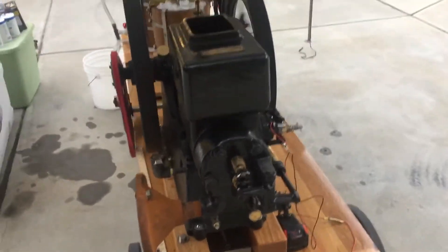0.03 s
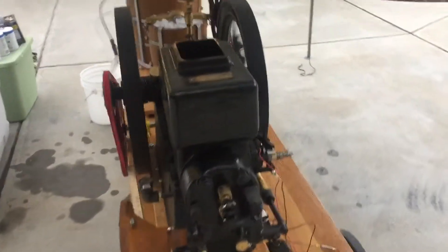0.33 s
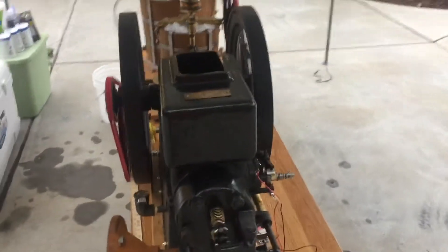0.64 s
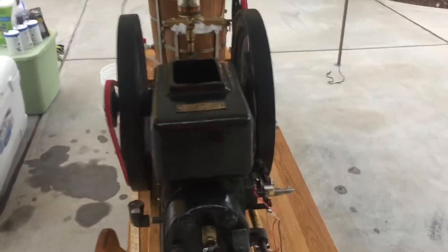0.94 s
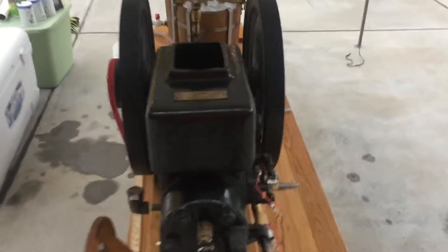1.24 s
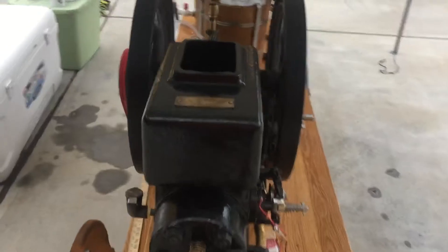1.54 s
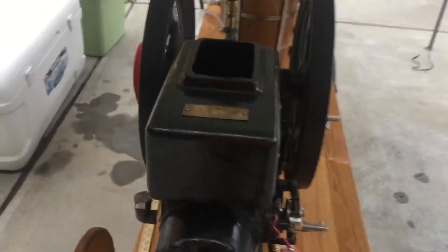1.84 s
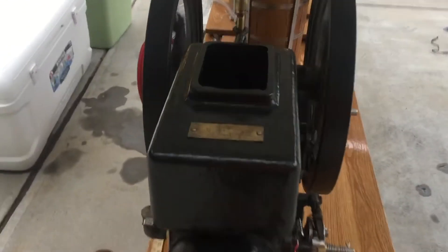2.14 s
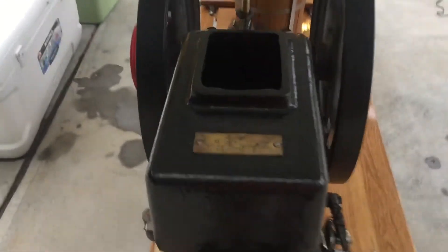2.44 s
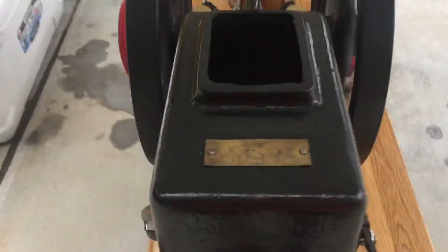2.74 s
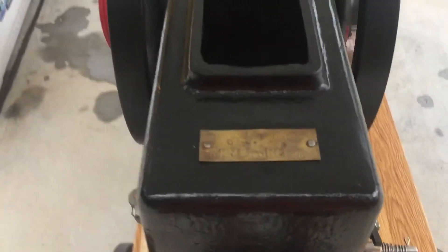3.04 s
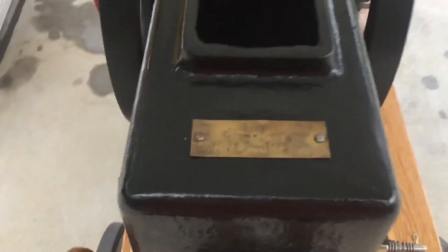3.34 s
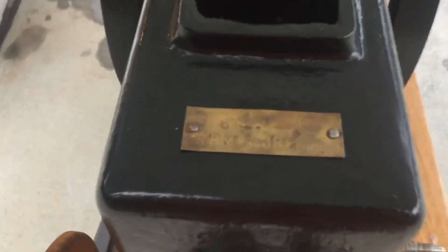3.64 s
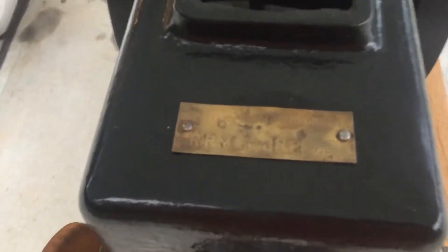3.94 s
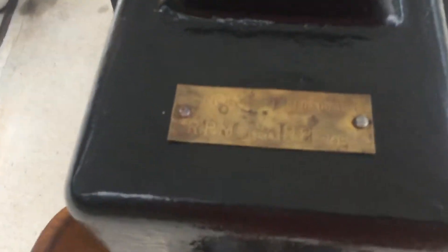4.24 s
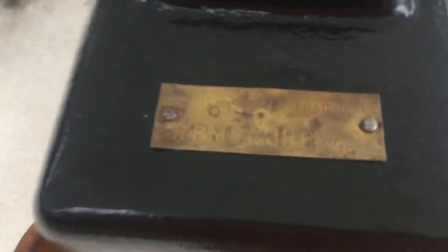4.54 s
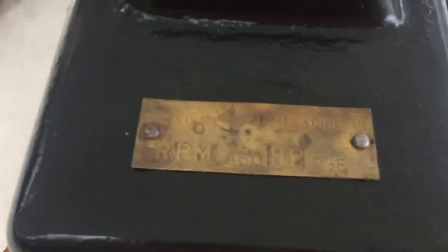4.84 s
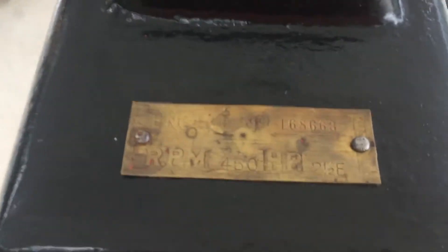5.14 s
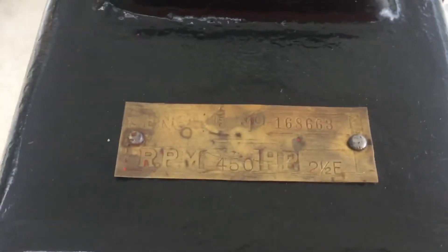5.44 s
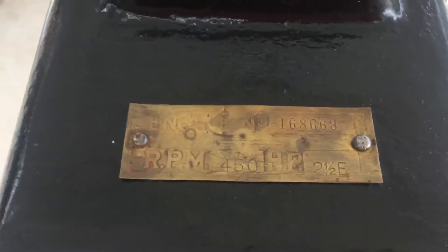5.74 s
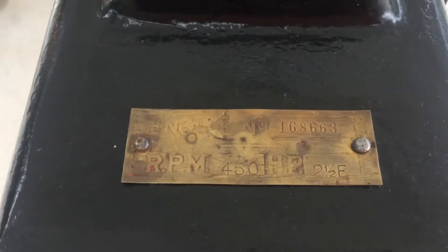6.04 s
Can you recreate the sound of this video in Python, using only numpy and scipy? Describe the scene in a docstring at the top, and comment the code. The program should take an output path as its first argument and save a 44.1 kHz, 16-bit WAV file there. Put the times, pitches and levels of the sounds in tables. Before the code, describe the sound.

Rhythmic hollow knocks and metal clacks from an antique engine running close by, broken by two short intake snorts and loud cracks.

```python
"""A single-cylinder hit-and-miss engine coasts over a concrete floor, slowing steadily, with a hollow
knock each turn; gears, push rod and governor latch clack at fixed crank angles. Near 0.9 s it is slow
enough to fire: the intake valve snorts, the igniter snaps and, at 1.25 s, the exhaust cracks.
It coasts again, fires once more at 4.3 s and coasts on. The clatter grows louder overall,
dips near 4.5 s, and takes on the hollow ring of the open water hopper."""
import sys
import numpy as np
from scipy import signal
from scipy.fft import rfft, irfft
from scipy.io import wavfile
from scipy.ndimage import uniform_filter1d

SR = 44100
rng = np.random.default_rng(int(sys.argv[2]) if len(sys.argv) > 2 else 0)


def store_pcm(level_fs):
    """Save levels as 16-bit WAV."""
    pcm = np.round(np.clip(level_fs, -1, 1) * 32767).astype(np.int16)
    wavfile.write(sys.argv[1], SR, np.atleast_2d(pcm).T)


N = 272538
AGE = np.arange(SR // 3) / SR  # time since a blow, t/s
STROKE_S = .178  # duration of an intake stroke

# the exhaust valve opens on a fired charge: t/s, blast level/dB, boom level/dB
FIRINGS = [(1.2529, -3.5, -14), (4.2800, -4, -7.5)]
# the piston starts to draw a charge: t/s, level/dB
INTAKE_STROKES = [(.918, -1.5), (3.961, 2.5)]
# noise spectra: f/Hz, spectral level/dB
JET_SPECTRUM = [(100, 4.5), (280, 7.5), (600, 0.5), (1200, -0.5), (2300, -1), (2650, 4), (3200, 1.5),
                (3600, 2.5), (4400, -0.5), (6000, 0), (9000, -8), (16000, -15)]  # escaping gas
SUCTION_SPECTRUM = [(200, -17), (700, 3.5), (2200, 1), (4000, -2.5), (7000, -11.5), (11000, -14.5),
                    (16000, -17)]  # air at the intake valve
IRON_SPECTRUM = [(53, -19), (90, -33), (173, 8.5), (270, -1), (707, 2.5), (1150, -6.5), (1680, -3),
                 (1930, -3), (2080, -1.5), (3120, -11.5), (3930, -11.5), (5350, -24.5), (6490, -26.5),
                 (7710, -45), (9000, -30), (11700, -136), (19800, -120)]  # struck castings
TICK_SPECTRUM = [(2000, -40), (3900, 11), (5000, 5), (6400, 6.5), (7600, 0), (9200, 1.5), (10500, -5.5),
                 (16000, -8.5)]  # hard metal contact
BEARING_SPECTRUM = [(30, -33), (65, -8.5), (100, -8.5), (150, -1), (266, -4.5), (364, 4), (437, -3.5),
                    (560, -2.5), (720, 0), (1010, -8.5), (2010, -12), (2830, -17.5), (4000, -35),
                    (5500, -40), (9000, -43.5), (16000, -49)]  # rubbing bearings
# modes of the linkage: f/Hz, level/dB, t60/s
LINKAGE_MODES = [(372, -8.5, 0.13), (503, -1.5, 0.23), (716, -0.5, 0.065), (859, -7, 0.085),
                 (1134, -7, .08), (1324, 0, 0.063), (1390, -4.5, 0.067), (1592, 3.5, 0.05),
                 (2120, -12, 0.26), (2270, -16, 0.14), (2565, -13.5, 0.12), (6700, -28, 0.15)]
# the clatter at the microphone: t/s, level/dB before each part's weight, share of hopper resonance
CLATTER_COURSE = [(0, -3, -0.64), (1.5, -2.5, -0.24), (2.5, -.5, -0.00038), (3.4, -0.5, -0.063),
                  (4.5, -2.22, 0.69), (6.18, 0, 0.29)]


def exhaust(pipe_db=-7, shove_db=8, hum_db=-24, rise_s=0.0041):
    """Blowdown: released gas shoves the air, and its turbulent jet excites the pipe's resonances."""
    pipe_modes = [(2705, 0, 0.026), (2962, 2, 0.045), (3193, -3.5, 0.037), (3420, -5, .035),
                  (4100, -3, 0.038), (4440, -12, .035), (5700, -12, .025)]  # exhaust pipe: f/Hz, level/dB, t60/s
    slap_echoes = [(1.335, -35.5), (4.365, -48)]  # a short, bright echo just after each pop: t/s, level/dB
    echo_spectrum = [(1500, -18), (2400, -14), (2900, 4), (4200, -2), (6000, -8), (16000, -19)]  # that echo: f/Hz, spectral level/dB
    out = np.zeros(N)
    shove = np.sin(phase(200 + 530 * np.exp(-AGE / .0018))) * fade(0.00043, 0.029)
    from_peak = AGE - 0.0295
    boom = np.cos(2 * np.pi * 55 * (from_peak + 0.0029)) * np.exp(-(from_peak / 0.0069) ** 2 / 2)
    hum_hz = 95 + 115 * (1 - np.exp(-np.maximum(AGE - .025, 0) / 0.0354))  # climbs as the cylinder empties
    hum = punch(np.sin(phase(hum_hz)) * fade(0.01, 0.29))
    since = np.maximum(AGE - rise_s, 0)
    burst, drain = amp(10 - 60 * since / 0.05), amp(-13.5 - 60 * since / 0.25)
    flow = np.minimum(AGE / rise_s, 1) ** 2 * (burst + drain)
    for s, db, boom_db in FIRINGS:
        jet = noise(JET_SPECTRUM) * flow
        pipe = punch(signal.fftconvolve(jet, ring(pipe_modes))[:len(AGE)], size=1500)
        blast = jet + amp(pipe_db) * pipe + amp(shove_db) * shove
        gusts = 1 + 0.37 * flutter(300)
        add(out, s, amp(db) * blast + amp(boom_db) * boom + amp(hum_db) * hum * gusts)
    for s, db in slap_echoes:
        add(out, s, amp(db) * punch(noise(echo_spectrum) * fade(.02, 0.21), size=2200))
    return out


def intake(closed_hz=383.5, swept_ratio=2.75, rough=0.31, gulp_hz=175, gulp_width_s=0.0021):
    """Helmholtz resonance: as air hisses in, the cylinder's volume grows and its hum falls in pitch."""
    draught_spectrum = [(30, -20), (60, 6), (250, 0), (500, -22), (2000, -60)]  # rumble of indrawn air: f/Hz, spectral level/dB
    gulps = [(1.011, -14), (1.0455, -12), (4.043, -10.5), (4.0765, -11.5)]  # the valve gapes and admits a gulp of air: t/s, level/dB
    out = np.zeros(N)
    travel = (1 - np.cos(np.pi * np.minimum(AGE / STROKE_S, 1))) / 2
    hum_hz = closed_hz / np.sqrt(1 + swept_ratio * travel)
    hum_level = amp(-23 - 60 * np.maximum(AGE - 0.94 * STROKE_S, 0) / 0.24) * (1 - np.exp(-AGE / 0.0069))
    for s, db in INTAKE_STROKES:
        speed = piston_speed(s + AGE)
        rumble = amp(-36) * speed ** 2 * noise(draught_spectrum)
        eddies = 1 - rough + rough * (flutter(350) + 1j * flutter(350))  # turbulence roughens the hum
        hum = hum_level * (eddies * np.exp(1j * phase(hum_hz))).imag
        seep = amp(-42) * np.sin(np.pi * AGE / AGE[-1])
        hiss = (amp(-26) * abs(speed) ** 5.3 + seep) * noise(SUCTION_SPECTRUM)
        add(out, s, amp(db) * (hiss + rumble + hum))
    t = np.arange(-.01, .01, 1 / SR)
    gulp = -np.cos(2 * np.pi * gulp_hz * t) * np.exp(-(t / gulp_width_s) ** 2 / 2)
    for s, db in gulps:
        add(out, s + t[0], amp(db) * gulp)
    return out


def valve_flutter():
    """Impact excitation: the intake valve flaps on its seat, and its stem and head ring freely."""
    flaps = [(0.942, -43, -44, -39), (.953, -26, -38, -38), (0.982, -34, -31.5, -34),
             (1.002, -38, -49, -42), (1.015, -27.5, -48, -42), (1.038, -22, -47, -38),
             (1.066, -31.5, -40, -35), (3.986, -23.5, -42, -39), (4.012, -27, -32, -50),
             (4.036, -31, -32, -39), (4.071, -20.5, -35, -41), (4.097, -30.5, -54, -44)]  # blows on the seat: t/s, click level/dB, stem level/dB, head level/dB
    stem_modes = [(6980, 2, 0.11), (7650, -18, .06)]  # valve stem: f/Hz, level/dB, t60/s
    head_modes = [(10400, -18, .05), (13040, 10, 0.038)]  # valve head: f/Hz, level/dB, t60/s
    out = np.zeros(N)
    stem, head = punch(ring(stem_modes)), punch(ring(head_modes))
    for s, click_db, stem_db, head_db in flaps:
        click = punch(noise(SUCTION_SPECTRUM) * fade(0.00053, 0.08), size=400)
        click += 0.53 * punch(noise(TICK_SPECTRUM) * fade(0.00034, 0.021), size=400)
        add(out, s, amp(click_db) * click + amp(stem_db) * stem + amp(head_db) * head)
    return out


def igniter():
    """Release of elastic energy: the spring-loaded igniter trips with a dry, broadband double snap."""
    snaps = [(1.168, -29.5), (1.181, -20), (4.200, -27), (4.206, -18.5)]  # the igniter trips: t/s, level/dB
    snap_spectrum = [(1000, -1), (2700, -2.5), (3500, 1), (4600, -5), (6200, 3), (9000, -6.5), (12000, -7),
                     (15500, 1)]  # its snap: f/Hz, spectral level/dB
    out = np.zeros(N)
    for s, db in snaps:
        add(out, s, amp(db) * punch(noise(snap_spectrum) * fade(0.00068, 0.031), size=300))
    return out


def combustion(groan_db=-25, leak_db=-24, leak_rise_s=0.014, length_s=0.04):
    """Pressure rise: before each pop the burning charge loads the bearings and leaks past the valve."""
    out, t = np.zeros(N), np.arange(-length_s, 0, 1 / SR)
    for s, _, _ in FIRINGS:
        groan = noise(BEARING_SPECTRUM, size=len(t)) * np.sqrt(np.linspace(0, 1, len(t)))
        leak = noise(JET_SPECTRUM, size=len(t)) * np.exp(t / leak_rise_s)
        add(out, s + t[0], amp(groan_db) * groan + amp(leak_db) * leak)
    return out


def crank_knocks(db=-18.8, limp_db=0.8, jitter_s=0.00021):
    """Clearance impact: crank play closes once a turn, alternately hard and soft, and rings the body."""
    blows = [(.0031, -1.4), (0.0108, -2.3), (0.0174, -5), (0.0237, -4), (0.0284, -7.5)]  # chatter within one knock: t/s from its start, level/dB
    body_modes = [(155.3, -2, .14), (170.97, 23, 0.0047), (298.6, -4, 0.082), (345, 7, 0.096),
                  (396.5, -8, 0.089), (514.5, 0, .059), (620, -8.5, .105), (719.5, -8, 0.12)]  # hollow engine body: f/Hz, level/dB, t60/s
    out = np.zeros(N)
    for angle, accent_db in enumerate([limp_db, -limp_db]):
        for s in crank_passes(angle, every=2)[0]:
            chatter = np.zeros(len(AGE))
            body = ring(body_modes, scatter=.2) * fade(0.0008, 9.0)
            for delay, blow_db in blows:
                add(chatter, delay + jitter_s * rng.normal(), -amp(blow_db) * body)
            level = amp(db + accent_db + clatter_db(s, hush_db=-11, near=1.75))
            add(out, s, level * punch(chatter, size=1400))
    return out


def gear_train():
    """Backlash: gear play closes at each piston reversal; cam and linkage strike every second turn."""
    gear_modes = [(392.4, -2, .1), (566.5, 4.5, 0.065), (636, 1, 0.083), (707, 1, 0.07), (877.6, 0, 0.12),
                  (1419, -13, 0.067), (1585, -10, 0.14), (1687, -2, 0.076), (2061, -4, 0.12),
                  (2233, -11.5, 0.15), (2694, -12, 0.095), (3220, -13, 0.071), (3780, -14, 0.066),
                  (6100, -26, 0.071)]  # gears: f/Hz, level/dB, t60/s
    cam_modes = [(524.5, -0.5, 0.085), (719, 6, 0.077), (1124, -5.5, 0.098), (1270, -9, 0.1),
                 (1411, -1.5, 0.077), (1561, -0.5, 0.059), (1851, -17, .09), (1977, -10, 0.11),
                 (2464, -8, 0.087), (2700, -12, 0.074), (2995, -12.5, 0.1), (4250, -13, 0.072)]  # cam meeting the push rod: f/Hz, level/dB, t60/s
    rattle = [(.092, -34, -45), (.122, -53, -38)]  # exhaust valve gear: t/s after a pop, iron level/dB, tick level/dB
    outward = strikes(.456, every=1, db=-24, tick_db=-43.5, hush_db=-15.5, near=1.26, slip=.15,
                      tick_hush_db=-20)
    inward = strikes(.037, every=1, db=-25, tick_db=-49.5, hush_db=-3.5, near=2.6, slip=.05,
                     tick_hush_db=1)
    cam = strikes(.94, every=2, db=-23.5, tick_db=-35, hush_db=-15.5, near=0.87, slip=.18,
                  tick_hush_db=-21, speed_power=2.9, release_db=-6.5)
    # the linkage falls slack, then is drawn taut
    slack = strikes(1.328, every=2, db=-28.5, tick_db=-50, hush_db=-19, near=2.8, slip=.2)
    taut = strikes(1.81, every=2, db=-34.5, tick_db=-59, hush_db=-18, near=1.7, slip=.11)
    linkage = np.vstack([slack, taut])
    seating = [(pop + delay, db, tick_db) for pop, _, _ in FIRINGS for delay, db, tick_db in rattle]
    return (clacks(outward, gear_modes, ring_db=2, slide_db=0.5, rise=0.001, snap=.3, t60=0.085)
            + clacks(inward, gear_modes, ring_db=-0.5, slide_db=1.5, rise=0.0015, snap=.3, t60=0.054)
            + clacks(cam, cam_modes, ring_db=1, slide_db=-6, rise=0.0056, snap=1.6, t60=0.074)
            + clacks(linkage, LINKAGE_MODES, ring_db=3.5, slide_db=-22, rise=0.0024, snap=.8, t60=0.093)
            + clacks(seating, LINKAGE_MODES, ring_db=-19, slide_db=-10, rise=0.0013, snap=.95, t60=.085))


def governor_latch():
    """Impact and plucking: the latch clacks onto the push rod and sets its spring vibrating."""
    catches = [(0.0692, -26, -47, -42), (.466, -29, -45, -36), (.870, -31.5, -47, -44),
               (1.6316, -31, -45.5, -38), (1.992, -28, -39, -41), (2.359, -26.5, -41, -38),
               (2.734, -26, -43, -33), (3.1181, -25, -36, -40), (3.5065, -27.5, -42, -45),
               (3.906, -25.5, -39.5, -43), (4.6467, -33.5, -48, -45), (4.997, -28.5, -45, -41),
               (5.354, -27.5, -41, -49), (5.7176, -25.5, -37.5, -42), (6.088, -25.5, -36.5, -34)]  # the latch catches: t/s, iron level/dB, tick level/dB, spring level/dB
    latch_modes = [(507.5, -5.5, 0.093), (717, 1.5, 0.091), (802, -4, 0.11), (1092, -3, 0.13),
                   (1236, -2.5, 0.1), (1388, -4.5, 0.17), (1820, -6, 0.08), (1980, -7, .12),
                   (1996, -6, 0.17), (2336, -11.5, 0.17), (2520, -8.5, .12)]  # latch: f/Hz, level/dB, t60/s
    spring_modes = [(3600, 0, .07), (3950, 8, .085), (6620, -10.5, 0.14)]  # its spring: f/Hz, level/dB, t60/s
    blows = [row[:3] for row in catches]
    out = clacks(blows, latch_modes, ring_db=0, slide_db=-21, rise=0.0013, snap=2.6, t60=0.19)
    ping = punch(ring(spring_modes) * fade(0.0018, 3.0))
    for s, _, _, spring_db in catches:
        add(out, s, amp(spring_db) * ping)
    return out


def push_rod():
    """Brief contact excites high modes: the rod clicks home, steel on steel, and rings thinly."""
    clicks = [(0.123, -46, -60, -54), (.523, -33, -52, -46), (1.6856, -43, -66, -61),
              (2.041, -31, -56, -56), (2.0477, -38, -53, -55), (2.4158, -32.5, -60, -48),
              (2.7915, -38, -54, -45), (3.172, -42, -47, -46), (3.5623, -38, -56, -51),
              (5.0504, -48, -58, -62), (5.4087, -36, -55, -56), (5.772, -36, -52, -60),
              (6.144, -30.5, -60, -58)]  # the rod seats: t/s, click level/dB, low and high ring level/dB
    click_spectrum = [(2000, -20), (5000, -6), (7500, -8), (9000, 2.5), (11500, -2.5), (13000, -1),
                      (15000, 0), (16000, 2)]  # the contact: f/Hz, spectral level/dB
    low_modes = [(6700, -11, .14), (8600, 7, 0.16), (8700, -4, .13)]  # the rod's lower ring: f/Hz, level/dB, t60/s
    high_modes = [(6331, -7, .14), (9400, 3, 0.16), (9490, -4, .13), (10880, -9, .13)]  # its upper ring: f/Hz, level/dB, t60/s
    out = np.zeros(N)
    envelope = fade(.0004, 0.026) + amp(-15) * fade(.0004, .13)
    for s, click_db, low_db, high_db in clicks:
        click = punch(noise(click_spectrum) * envelope, size=400)
        low, high = punch(ring(low_modes, scatter=.4)), punch(ring(high_modes, scatter=.4))
        add(out, s, amp(click_db) * click + amp(low_db) * low + amp(high_db) * high)
    return out


def clacks(blows, modes, ring_db, slide_db, rise, snap, t60):
    """Modal response: iron faces slide, then strike; dense modes clank, sparse ones ring, edges tick."""
    out, shared_noise = np.zeros(N), noise(IRON_SPECTRUM)  # keeps the cycles much alike
    slide = signal.windows.hann(530)
    tick_envelope = snap * fade(.0003, 0.0099) + fade(0.00091, 0.065) + 0.31 * fade(0.0043, 0.22)
    for s, db, tick_db in blows:
        bounce = amp(4 * flutter(90))  # the faces bounce as they meet
        clank = punch((shared_noise + noise(IRON_SPECTRUM)) * fade(rise, t60))
        tones = punch(ring(modes, scatter=0.6) * fade(rise, 4.9))
        tick = punch(noise(TICK_SPECTRUM) * bounce * tick_envelope)
        add(out, s - .001, amp(db) * (clank + amp(ring_db) * tones) + amp(tick_db) * tick)
        add(out, s - .008, amp(db + slide_db) * slide * noise(IRON_SPECTRUM)[:len(slide)])
    return out


def strikes(angle, every, db, tick_db, hush_db, near, slip, tick_hush_db=-6, speed_power=4.9,
            release_db=0):
    """Faster impacts are brighter. Blows at one crank angle: t/s, iron level/dB, tick level/dB."""
    s, speed = crank_passes(angle, every, slip)
    # within 0.1 s of an intake's start the governor lets the push rod go
    force_db = release_db * sum(abs(s - start) < .1 for start, _ in INTAKE_STROKES)
    iron_level = db + clatter_db(s, hush_db, near)
    tick_level = tick_db + speed_power * 20 * np.log10(speed) + clatter_db(s, tick_hush_db, near)
    return np.transpose([s, iron_level + force_db, tick_level + force_db])


def crank_passes(angle, every, slip=0, usual_turn_s=.18):
    """Deceleration lengthens each turn. Gives t/s and relative speed at a crank angle given in turns."""
    coasts = [(-.0564, .96, .19597, .00172), (1.512, 3.99, .17695, .001894), (4.5304, 6.18, .1722, .0017)]  # flywheel coasts: first knock t/s, end t/s, period/s, growth per turn/s
    rows, turn = [], np.arange(0, 16, every) + angle
    for first, last, period, slowing in coasts:
        turn_s = period + slowing * turn
        early_s = slip * (turn_s - usual_turn_s)
        s = first + turn * (period + turn_s) / 2 - early_s
        rows.append(np.array([s, usual_turn_s / turn_s])[:, s < last])
    return np.hstack(rows)


def piston_speed(s):
    """Harmonic motion: piston speed, 0 to 1, is a half sine over each intake stroke."""
    return sum(np.sin(np.pi * np.clip((s - start) / STROKE_S, 0, 1)) for start, _ in INTAKE_STROKES)


def clatter_db(s, hush_db, near):
    """Gains add in decibels: the clatter's course, weighted by near, and hush_db around each firing."""
    when, course_db, _ = np.transpose(CLATTER_COURSE)
    hush_s = [-0.17, -0.06, 0, 1.07]  # sets in with compression, holds until the pop, then wears off
    hush = sum(np.interp(s - pop, hush_s, [0, 1, 1, 0]) ** 1.7 for pop, _, _ in FIRINGS)
    return near * np.interp(s, when, course_db) + hush_db * hush


def grind(rub_db=-30, teeth_db=-33, taps_per_s=130, spread_db=2.5, uneven_db=2.5):
    """Friction noise: bearings rub unevenly, while loose gear teeth tap the castings at random."""
    load = unit(uniform_filter1d(flutter(1100, size=N), size=700))
    level = amp(clatter_db(np.arange(N) / SR, hush_db=-9, near=0.63) + uneven_db * np.clip(load, -2, 1))
    taps = (rng.random(N) < taps_per_s / SR) * rng.choice([-1, 1], N)
    force = amp(spread_db * np.minimum(rng.exponential(1, N), 3))
    clank = punch(noise(IRON_SPECTRUM) * fade(0.00041, 0.075))
    tooth = (clank + 0.77 * punch(ring(LINKAGE_MODES, scatter=0.077))) * fade(0.0007, 3.0)
    teeth = unit(signal.oaconvolve(taps * force, tooth)[:N])
    return level * (amp(rub_db) * noise(BEARING_SPECTRUM, size=N) + amp(teeth_db) * teeth)


def hopper(x):
    """Resonance: the open water hopper and its iron colour the clatter as the microphone moves over."""
    resonances = [(161, 3.1, 0.65), (718, 2.8, 0.92), (906, 12, -1), (1300, 2.7, 0.69), (2790, 1.7, -0.073)]  # peaks that grow (+) or fade (-) over the hopper: f/Hz, Q, strength
    when, _, share = np.transpose(CLATTER_COURSE)
    colour = sum(strength * signal.lfilter(*signal.iirpeak(hz, q, fs=SR), x)
                 for hz, q, strength in resonances)
    return x + np.interp(np.arange(N) / SR, when, share) * colour


def room(x, stretch):
    """Reverberation: diffuse reflections from concrete and walls decay at a different rate per band."""
    decay_times = [(100, 0.29), (500, 0.37), (2000, 0.46), (5000, 0.52), (10000, 0.29), (16000, 0.49)]  # reflections: f/Hz, t60/s before stretch
    hz, t, bands = signal.stft(rng.standard_normal(2 * SR), SR, nperseg=256)
    t60 = stretch * read(decay_times, hz)[:, None]
    tail = signal.istft(bands * amp(-60 * t / t60), SR, nperseg=256)[1]
    tail *= np.minimum(np.arange(len(tail)) / SR / 0.0023, 1)
    tail = cut_bass(tail, hz=150)  # bass escapes the open space
    return signal.fftconvolve(x, tail / np.linalg.norm(tail))[:N]


def ring(modes, scatter=0):
    """Superposition of damped modes; scatter varies strength and phase with the point of contact."""
    out = np.zeros(len(AGE))
    for hz, db, t60 in modes:
        excitation = 1 + scatter * (rng.normal() + 1j * rng.normal())
        out += amp(db - 60 * AGE / t60) * (excitation * np.exp(2j * np.pi * hz * AGE)).real
    return out


def noise(spectrum, size=len(AGE)):
    """Spectral shaping of white noise, to rms 1."""
    gain = amp(read(spectrum, np.fft.rfftfreq(size, 1 / SR)))
    return unit(irfft(rfft(rng.standard_normal(size)) * gain, size))


def flutter(width, size=len(AGE)):
    """A moving average over width samples turns noise into a slower fluctuation of rms 1."""
    return unit(uniform_filter1d(rng.standard_normal(size), size=width))


def fade(rise, t60):
    """Exponential rise and decay of a blow, both times in seconds."""
    return (1 - np.exp(-AGE / rise)) * amp(-60 * AGE / t60)


def phase(hz):
    """Phase is the time integral of angular frequency."""
    return 2 * np.pi * np.cumsum(hz) / SR


def cut_bass(x, hz):
    """Second-order high-pass filter."""
    return signal.sosfilt(signal.butter(2, hz, "high", fs=SR, output="sos"), x)


def read(points, hz):
    """Interpolation on a logarithmic frequency axis."""
    f, value = np.transpose(points)
    return np.interp(np.log(hz + 1), np.log(f), value)


def amp(db):
    """Amplitude ratio of a level in decibels."""
    return 10 ** (np.asarray(db) / 20)


def unit(x):
    """Normalisation to rms 1."""
    return punch(x, size=len(x))


def punch(x, size=882):
    """Normalisation to rms 1 over the first size samples, by default 20 ms."""
    return x / np.sqrt(np.mean(x[:size] ** 2) + 1e-20)


def add(mix, s, sound):
    """Superposition of a sound on the mix at time s."""
    start = round(s * SR)
    sound = sound[max(-start, 0):]
    part = mix[max(start, 0):][:len(sound)]
    part += sound[:len(part)]


def scene():
    """Direct and reverberant fields add: the engine is close, and its pops wake far reflections."""
    iron = (crank_knocks() + gear_train() + governor_latch() + push_rod()
            + grind() + combustion() + igniter())
    iron = cut_bass(hopper(iron), hz=70)  # small parts radiate little bass
    air, pops = intake() + valve_flutter(), exhaust()
    near_reflections = amp(-15.5) * room(iron + .5 * air, stretch=0.57)
    far_reflections = amp(-31.5) * room(pops, stretch=5.1)
    return (iron + air + pops + near_reflections + far_reflections)[None]


def record(dry, ceiling=0.64, threshold_db=-14, ratio=1.06, recovery_db_per_s=32, edge_hz=16100):
    """Saturation and compression: pops overload the microphone and duck the gain; a low-pass follows."""
    clipped = dry / (1 + (dry / ceiling) ** 6) ** (1 / 6)
    power = signal.lfilter(np.ones(1300) / 1300, 1, clipped[0] ** 2)
    over_db = np.maximum(10 * np.log10(power + 1e-12) - threshold_db, 0)
    fall = recovery_db_per_s * np.arange(N) / SR
    held_db = np.maximum.accumulate(over_db + fall) - fall
    duck_db = signal.lfilter([.0004], [1, -.9996], held_db) * (1 - 1 / ratio)
    band_limit = signal.firwin(511, edge_hz, window=("kaiser", 9), fs=SR)
    return signal.oaconvolve(clipped / amp(duck_db), band_limit[None], "same")


dry = scene()
out = record(dry)
store_pcm(out)
```